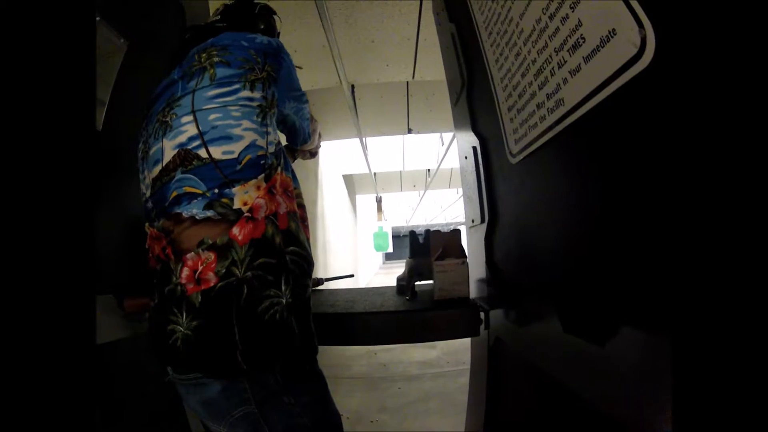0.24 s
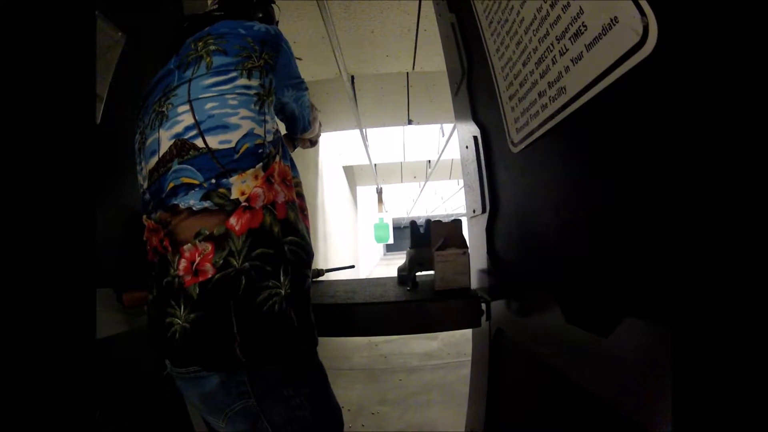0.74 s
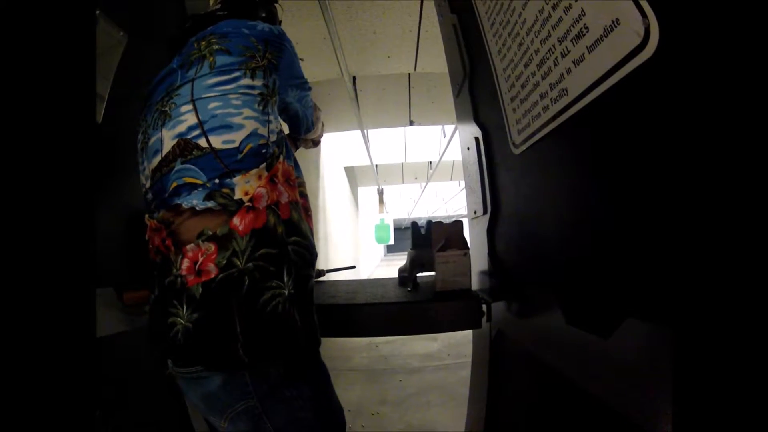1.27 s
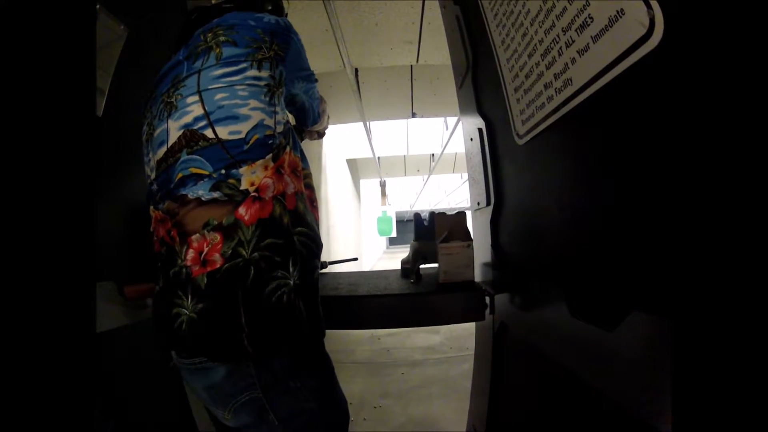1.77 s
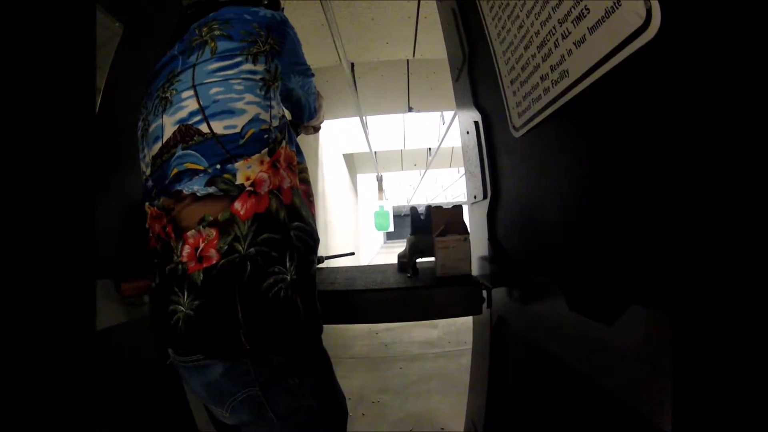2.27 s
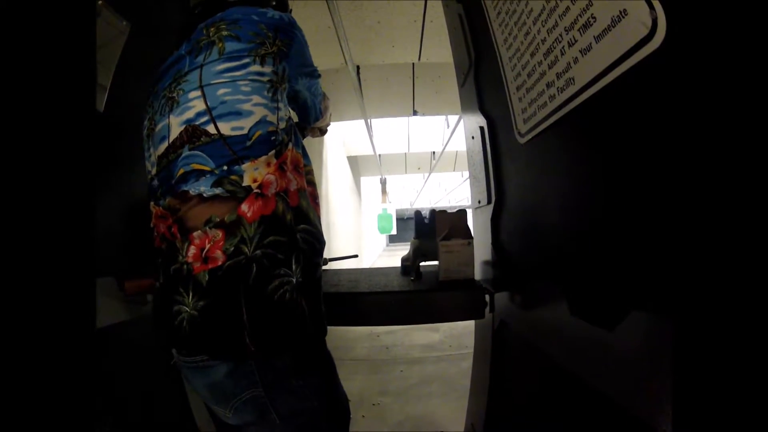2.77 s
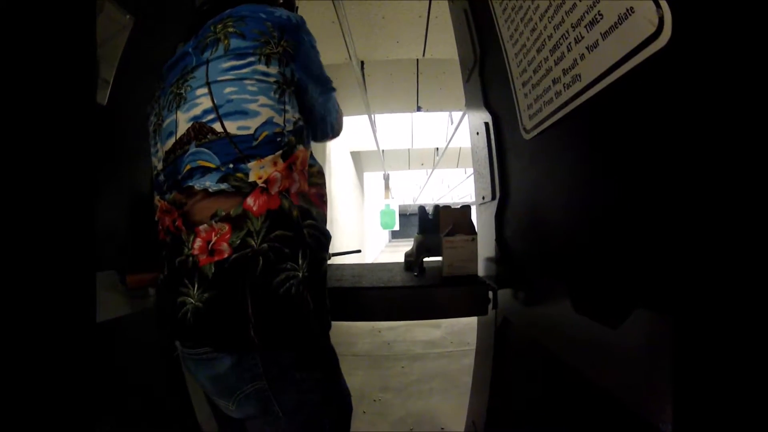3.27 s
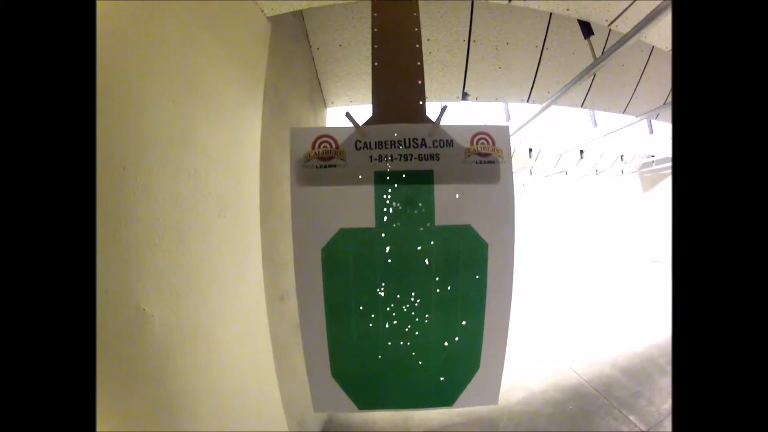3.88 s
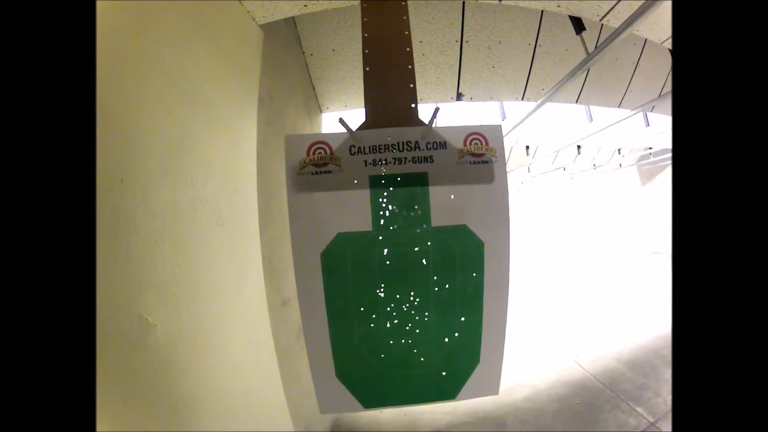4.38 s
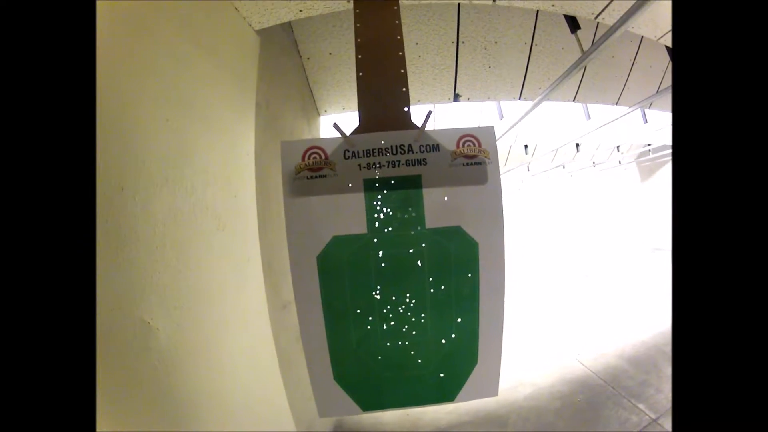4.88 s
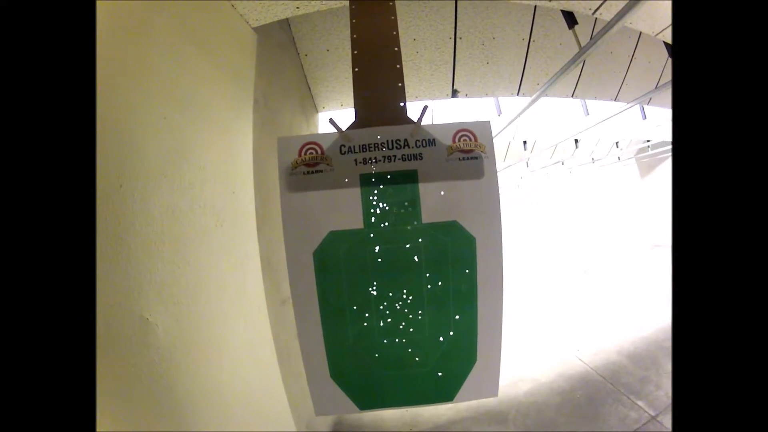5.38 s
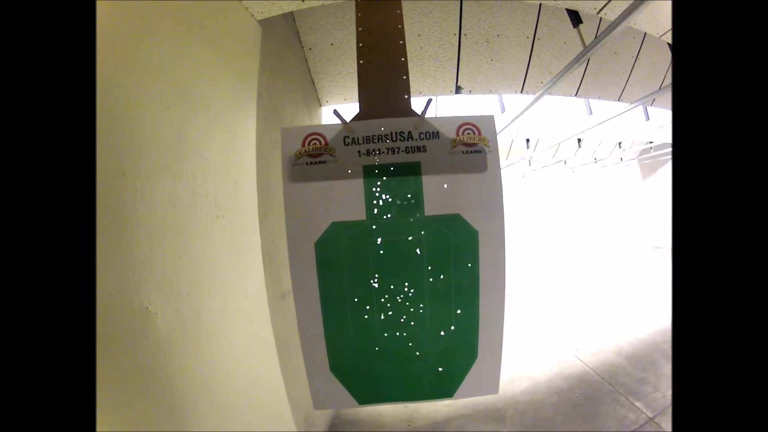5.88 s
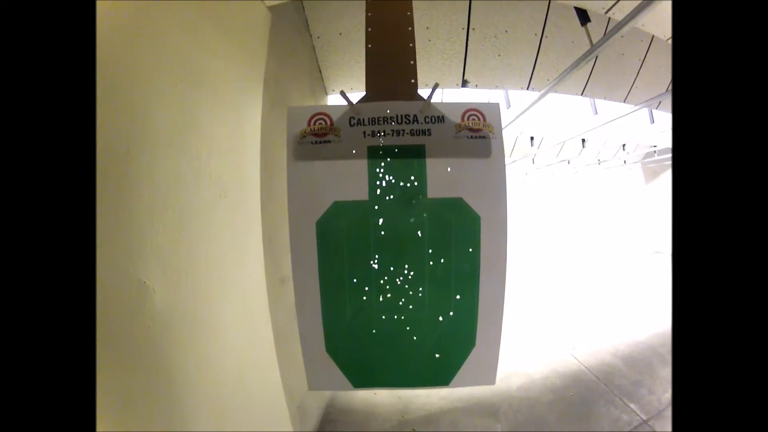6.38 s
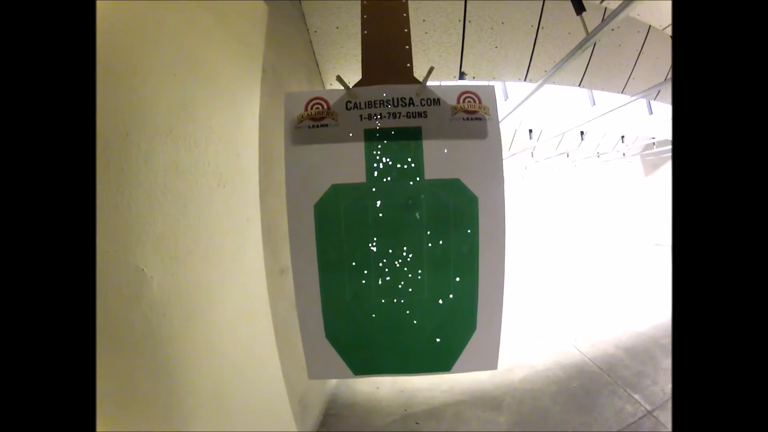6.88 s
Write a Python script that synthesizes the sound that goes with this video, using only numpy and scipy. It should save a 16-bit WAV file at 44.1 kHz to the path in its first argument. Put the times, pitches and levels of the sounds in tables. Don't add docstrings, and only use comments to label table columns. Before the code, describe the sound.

Close pistol shots in an indoor range: four in quick succession, a short gap, then five more. Each harsh crack overloads a cheap microphone, ducks, and the room roar swells back with dull wall thumps. After the last tail dies, an abrupt cut brings low ventilation drone, faint paper rustling, one small metallic tick, and two booming shots from far lanes.

```python
import sys
import numpy as np
from scipy import signal
from scipy.fft import rfft, irfft
from scipy.io import wavfile

SR = 44100
rng = np.random.default_rng(int(sys.argv[2]) if len(sys.argv) > 2 else 0)


def store_wav(level_fs):
    pcm = np.round(np.clip(np.atleast_2d(level_fs), -1, 1) * 32767)
    wavfile.write(sys.argv[1], SR, pcm.T.astype(np.int16))


def invert_db(level):
    return 10 ** (np.asarray(level, dtype=float) / 20)


N = 314852
TIME = np.arange(N) / SR
CUT_S = 3.778


def rms_one(x):
    return x / np.sqrt(np.mean(x ** 2) + 1e-20)


def coloured(spectrum):
    hz = np.fft.rfftfreq(N, 1 / SR) + 1
    table_hz, table_db = np.transpose(spectrum)
    db = np.interp(np.log(hz), np.log(table_hz), table_db)
    return rms_one(irfft(rfft(rng.standard_normal(N)) * invert_db(db), N))


def band(x, low_hz, high_hz):
    return signal.sosfilt(signal.butter(3, [low_hz, high_hz], "band", fs=SR, output="sos"), x)


def split(x, low_hz, high_hz):
    spectrum, hz = rfft(x), np.fft.rfftfreq(N, 1 / SR)
    masks = hz < low_hz, (hz >= low_hz) & (hz < high_hz), hz >= high_hz
    return [rms_one(irfft(spectrum * mask, N)) for mask in masks]


def drift(rate_hz):
    r = np.exp(-2 * np.pi * rate_hz / SR)
    wander = signal.lfilter([1], [1, -2 * r, r * r], rng.standard_normal(N + SR))
    return rms_one(wander[SR:])


def ring(clicks, hz, t60):
    r, w = invert_db(-60 / (t60 * SR)), 2 * np.pi * hz / SR
    return signal.lfilter([0, np.sin(w)], [1, -2 * r * np.cos(w), r * r], clicks + 1e-18)


def hum(hz, width_hz):
    r = np.exp(-np.pi * width_hz / SR)
    resonance = [1, 0, -1, 1, -2 * r * np.cos(2 * np.pi * hz / SR), r * r]
    return rms_one(signal.sosfilt([resonance, resonance], rng.standard_normal(N)))


def envelope(start, end, rise, fall):
    return invert_db(-rise * np.maximum(start - TIME, 0) - fall * np.maximum(TIME - end, 0))


def struck(events, modes):
    times, db = np.transpose(events)
    at = (times * SR).astype(int)
    odd = rng.standard_normal((len(at), len(modes)))
    out = np.zeros(N)
    for k, (hz, mode_db, t60) in enumerate(modes):
        clicks = np.zeros(N)
        clicks[at] = invert_db(db + mode_db + 0.31 * odd[:, k])
        out += ring(clicks, hz, t60)
    return signal.sosfilt(signal.butter(4, 1100, fs=SR, output="sos"), out)


def recovery(since, hold):
    return 7 * (1 - np.exp(-np.maximum(since - hold, 0) / 0.19))


# f/Hz, level/dB (per Hz)
ROAR_SPECTRUM = [(18, -48), (30, -29), (54, -24.5), (86, -15), (114, -15.5), (312, -3), (424, -2),
                 (516, -7.5), (656, -3.5), (765, -11.5), (891, -15), (1040, -20), (2900, -17.5),
                 (3950, -19), (5600, -32), (7280, -56), (12300, -120)]
# f/Hz, width/Hz, level/dB
PANELS = [(637, 116, 7), (891, 100, 2.5), (1160, 120, -5.5), (1462, 140, -3), (1770, 130, -1),
          (2133, 100, -4), (2400, 47, -4.5), (2740, 290, -2), (2960, 170, -5.5)]


def panel_ring():
    panels = rms_one(sum(invert_db(db) * invert_db(3.5 * drift(11.5)) * hum(hz, width * 0.86) for hz, width, db in PANELS))
    last_s = SHOT_TIMES[-1]
    return panels * invert_db(-23.5) * envelope(last_s + 0.63, last_s + 0.79, 47, 38)


def roar():
    rumble, boom, hiss = split(coloured(ROAR_SPECTRUM), 170, 1000)
    earlier_shot_s, flutter_s = -0.246, .045
    starts = np.array(SHOT_TIMES)
    since = TIME - np.append(earlier_shot_s, starts)[np.searchsorted(starts, TIME)]
    lift = recovery(since, 0.17)
    sink = 32.5 * np.maximum(since - 0.6, 0)
    boom_db = -23 + lift - sink
    hiss_db = -36.5 + 1.25 * lift - 0.87 * sink
    rumble_db = -41.5 + 1.11 * recovery(since, 0.11) - 0.27 * sink
    early_db = 8 * np.exp(-since / 0.048) + 6 * np.exp(-since / 0.15)
    slap_db = 4 * np.exp(-((since - flutter_s - .004) / 0.0082) ** 2) + 4 * np.exp(-since / 0.058)
    flutter_db = 0.5 * np.cos(2 * np.pi * since / flutter_s)
    tail = boom * invert_db(boom_db + slap_db + flutter_db + 1.4 * drift(14))
    tail += hiss * invert_db(hiss_db + early_db + 0.5 * drift(51))
    tail += rumble * invert_db(rumble_db + 2.2 * drift(16.6))
    return (tail + panel_ring()) * (TIME <= CUT_S)


# t/s, level/dB (peak)
WALL_THUMPS = [(0.104, -23), (0.231, -4), (0.309, -10), (0.369, -1), (1.349, -6.5), (1.399, -14),
               (1.449, -34), (1.5, -13), (3.085, -13), (3.154, -7), (3.207, 0), (3.273, -1), (3.341, 0),
               (3.369, 0.5), (3.423, -2.5), (3.466, -17), (6.419, 0), (6.512, -21), (6.573, -1),
               (6.976, -3), (7.069, -5.5)]
# f/Hz, level/dB, t60/s
WALL_MODES = [(360, -18, 0.18), (462, -31.5, 0.11), (620, -9, 0.088)]


def wall_thumps():
    return struck(WALL_THUMPS, WALL_MODES)


SHOT_TIMES = [
    .3707,
    .6442,
    .8748,
    1.1163,
    1.6342,
    2.0681,
    2.3067,
    2.5286,
    2.7423,
]
# level/dB (peak), time until the gain catches it/ms, pressure push level/dB
SHOT_SHAPES = [
    (3, 7.4, -9),
    (3, 4.76, -10),
    (3, 2.4, -35.5),
    (3, 2.86, -7.5),
    (3, 8, -5),
    (3, 6.2, -5),
    (3, 3.8, -22),
    (3, 3.6, -20),
    (3, 2.9, -32.5),
]
# f/Hz, level/dB, t60/s
BLAST_MODES = [(580, 5.5, .02), (4050, 1, .006), (350, -6, .05), (1270, -10, .02), (2150, -9, .02),
               (3300, -7, .012)]
# t/ms, level/dB
CRACK_ECHOES = [(2.5, -8.5), (3.7, -5), (5.6, -24)]


def blasts():
    out, size = np.zeros(N), round(.06 * SR)
    t, click = np.arange(size) / SR, np.eye(1, size)[0]
    swell = np.clip(t / .0016, .35, 1)
    debris = rng.standard_normal((len(SHOT_SHAPES), size))
    spread = rng.standard_normal((len(SHOT_SHAPES), len(BLAST_MODES) + len(CRACK_ECHOES)))
    for s, (db, open_ms, push_db), noise, odd in zip(SHOT_TIMES, SHOT_SHAPES, debris, spread):
        cracks = click.copy()
        for (ms, echo_db), o in zip(CRACK_ECHOES, odd[::-1]):
            cracks[round((ms + .15 * o) * SR / 1000)] += invert_db(echo_db)
        wave = np.zeros(size)
        for (hz, mode_db, t60), o in zip(BLAST_MODES, odd):
            is_crack = hz > 1000
            mode = ring(cracks if is_crack else click, hz * (1 + o / 70), t60)
            wave -= invert_db(mode_db + o) * mode * (1 if is_crack else swell)
        scatter = invert_db(-7.0) * rms_one(band(noise, 1460, 4800)) + invert_db(-9.0) * rms_one(band(noise, 356, 770))
        wave += scatter * np.clip(t / 0.0042, .1, 1) ** 2
        wave -= invert_db(push_db) * np.sin(2 * np.pi * t / (open_ms * .00125))
        gain = 1 / (1 + np.exp((t * 1000 - open_ms) / 1.1))
        wave += scatter * invert_db(-9.5) * np.exp(-t / 0.012) * (1 - gain) / gain.clip(1e-9)
        at = round(s * SR)
        out[at:at + size] += invert_db(db) * wave * gain * np.minimum(t / .00015, 1)
    return out


# f/Hz, level/dB (per Hz)
AIR_SPECTRUM = [(18, -40), (30, -8), (92, -10), (124, -12), (155, -11), (189, -10), (245, -7), (371, -12.5),
                (405, -15.5), (732, -18), (1020, -36.5), (3170, -35.5), (5600, -50.5), (7280, -104),
                (12300, -120)]
# f/Hz, width/Hz, level/dB
DUCT_DRONES = [(243.3, 5.6, -38), (213.8, 13.3, -40), (88, 25, -42.5)]


def ventilation():
    air = invert_db(-35) * coloured(AIR_SPECTRUM)
    drones = sum(invert_db(db) * hum(hz, width) for hz, width, db in DUCT_DRONES)
    blade_hz = 240 + 4 * drift(3.4)
    blades = invert_db(-52 + 0.65 * drift(12)) * np.sin(2 * np.pi * np.cumsum(blade_hz) / SR)
    return (air + drones + blades) * (TIME > CUT_S)


# start t/s, end t/s, start level/dB, end level/dB
RUSTLES = [
    (4.7, 5.185, -65, -52),
    (5.26, 5.4, -52, -62),
    (5.43, 5.637, -53.5, -50.5),
    (5.715, 5.74, -54, -55),
]


def paper_target():
    shaken = sum(invert_db(np.interp(TIME, [a, b], [a_db, b_db])) * envelope(a, b, 400, 400)
                 for a, b, a_db, b_db in RUSTLES)
    return shaken * invert_db(1.0 + 1.1 * drift(30)) * (hum(2730, 1200) + .5 * hum(4100, 1300))


def clamp_tick():
    click = np.zeros(N)
    click[round(6.058 * SR)] = invert_db(-37.5)
    return .45 * ring(click, 5100, .06) + .8 * ring(click, 4000, .006) + .7 * ring(click, 4700, .008)


# t/s, level/dB
BACK_SLAPS = [
    (6.208, -19),
    (6.30, -7),
    (6.777, -18.5),
    (6.86, -9),
]
# f/Hz, level/dB, t60/s
HALL_MODES = [(242, 3, 0.16), (367, 1, 0.39), (368, -9, 0.14), (510, -39, 0.11)]


def back_wall_slaps():
    return struck(BACK_SLAPS, HALL_MODES)


# t/s, boom level/dB, hiss level/dB, crack level/dB, boom decay/(dB/s)
FAR_SHOTS = [
    (6.23, -10.5, -26.5, -25, 17),
    (6.795, -10.5, -26, -25.5, 6),
]


def far_envelopes():
    power = 0
    for s, boom_db, hiss_db, crack_db, decay in FAR_SHOTS:
        swell = np.clip((TIME - s + .022) / .005, 0, 1)
        boom = invert_db(boom_db) * swell * envelope(s, s + 0.2, 402, decay)
        highs_s = s + 0.028
        hiss = invert_db(hiss_db) * envelope(highs_s, highs_s + 0.022, 600, 21.5)
        crack = invert_db(crack_db) * envelope(highs_s, highs_s + 0.022, 600, 70)
        power = power + np.square([boom, hiss, crack])
    return np.sqrt(power)


# f/Hz, level/dB (per Hz)
FAR_SPECTRUM = [(18, -57), (30, -26), (69, -2), (124, -13), (225, 1.5), (286, -3.5), (333, 3.5), (388, -4),
                (642, -5), (799, -12.5), (973, -19), (1290, -31), (2720, -30), (5130, -39.5), (5600, -46),
                (7280, -71), (12300, -120)]


def far_shots():
    rumble, boom, hiss = split(coloured(FAR_SPECTRUM), 98, 930)
    boom_gain, hiss_gain, crack_gain = far_envelopes()
    low = (boom + invert_db(-19) * rumble) * boom_gain * invert_db(-1.0 + 0.28 * drift(25))
    high = hiss * hiss_gain * invert_db(-1.5 + 2.2 * drift(30))
    crack = (hum(2900, 750) + 0.59 * hum(4200, 1900)) * crack_gain * invert_db(-3.0)
    return low + high + crack


def scene():
    booth = roar() + wall_thumps() + blasts()
    lane = ventilation() + paper_target() + clamp_tick() + back_wall_slaps() + far_shots()
    return (booth + lane)[None]


THIN_MOMENTS = [
    2.113,
    3.543,
    3.695,
    3.882,
    5.19,
    5.51,
    6.551,
    6.637,
    7.105,
]


def thin_highs(x):
    out, half = x.copy(), round(.03 * SR)
    t, hz = np.arange(-half, half) / SR, np.fft.rfftfreq(2 * half, 1 / SR)
    for s, lines in zip(THIN_MOMENTS, rng.uniform(1300, 5200, (len(THIN_MOMENTS), 9))):
        part = slice(round(s * SR) - half, round(s * SR) + half)
        spectrum = rfft(x[part] * np.hanning(2 * half))
        near_line = np.abs(hz[:, None] - lines).min(axis=1) < 40
        lost = np.exp(-(t / .007) ** 4) * irfft(spectrum * (hz > 1050), 2 * half)
        kept = np.exp(-(t / .012) ** 4) * irfft(spectrum * near_line, 2 * half)
        out[part] += 1.6 * kept - .93 * lost
    return out


def low_pass(x):
    return signal.sosfilt(signal.butter(12, 16600, fs=SR, output="sos"), x)


def record(dry):
    x = dry[0] + .06 * np.tanh(dry[0]) ** 2
    x = thin_highs(signal.sosfilt(signal.butter(2, 20, "high", fs=SR, output="sos"), x))
    slow = np.clip(signal.resample_poly(x, 40, 147), -.98, .98)
    held = signal.resample_poly(np.repeat(slow, 4), 147, 160)[:N]
    held = signal.sosfiltfilt(signal.cheby2(10, 30, 15700, fs=SR, output="sos"), held)
    held = np.clip(np.pad(held, (0, N - len(held))), -1, 1)
    return low_pass(held[None])


dry = scene()
out = record(dry)
store_wav(out)
```